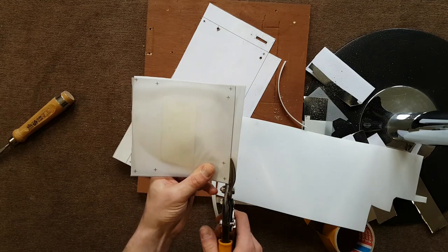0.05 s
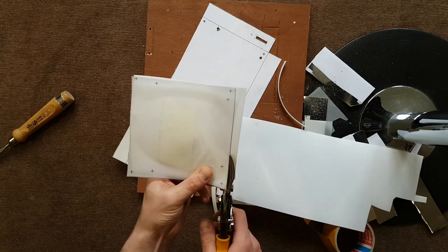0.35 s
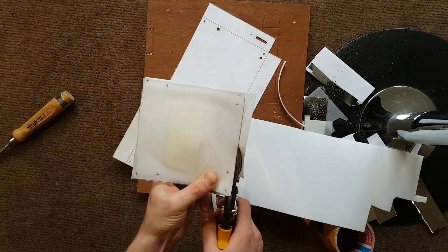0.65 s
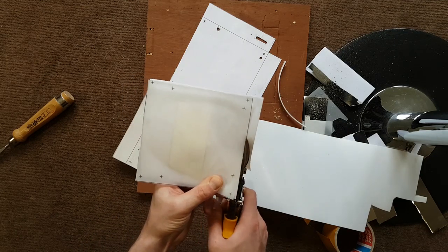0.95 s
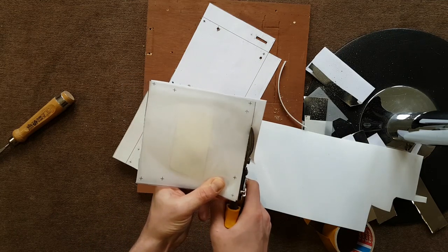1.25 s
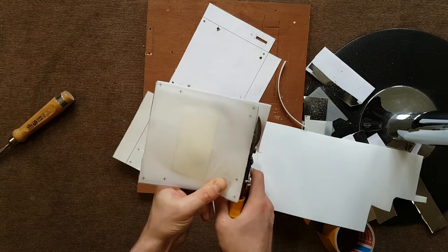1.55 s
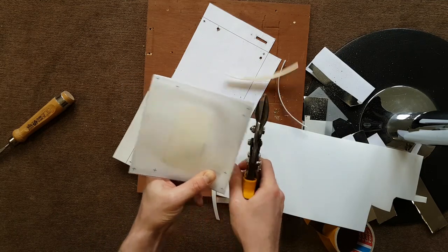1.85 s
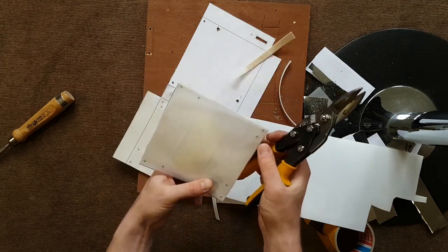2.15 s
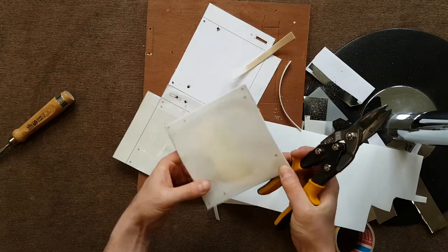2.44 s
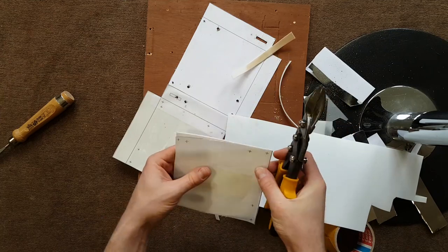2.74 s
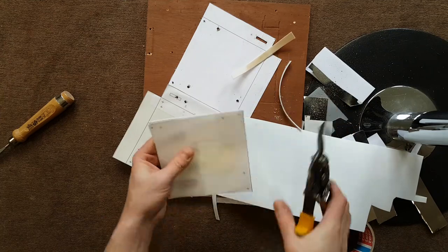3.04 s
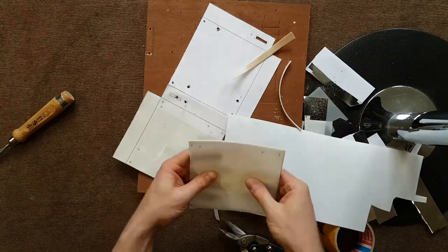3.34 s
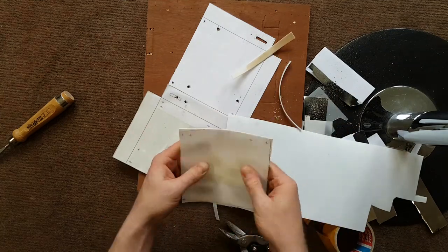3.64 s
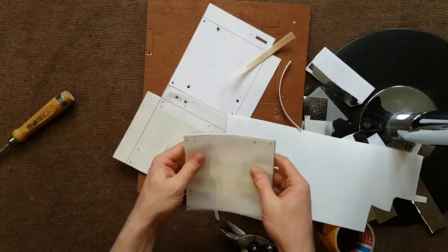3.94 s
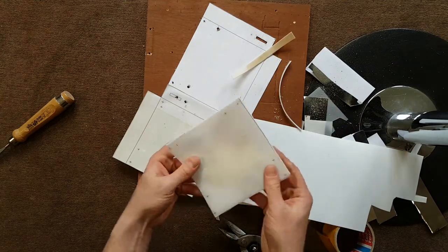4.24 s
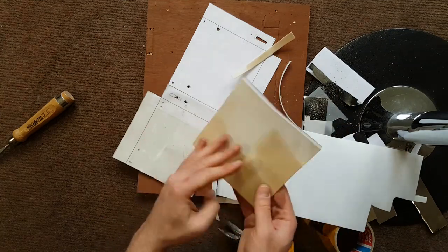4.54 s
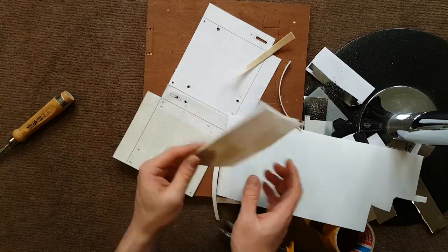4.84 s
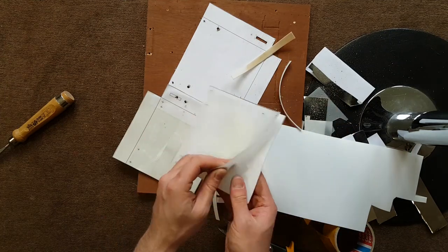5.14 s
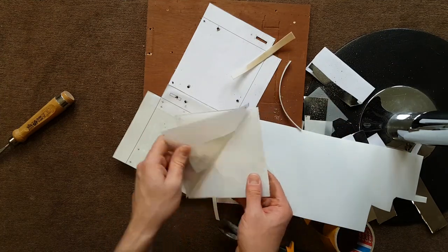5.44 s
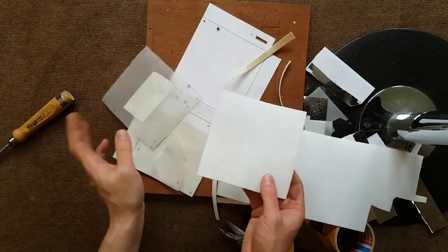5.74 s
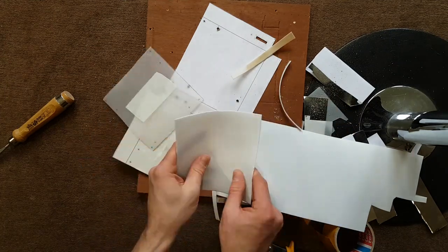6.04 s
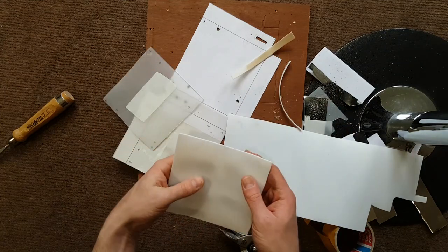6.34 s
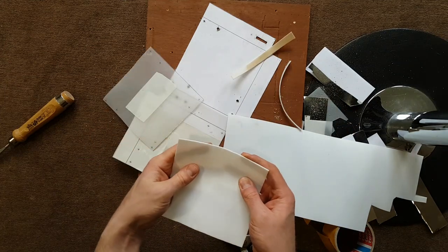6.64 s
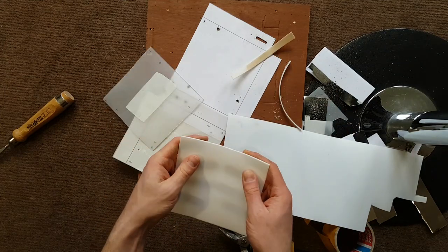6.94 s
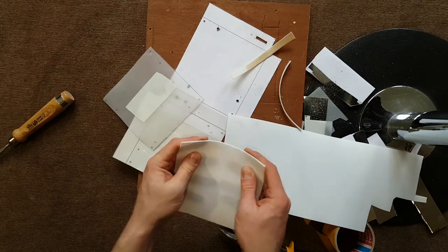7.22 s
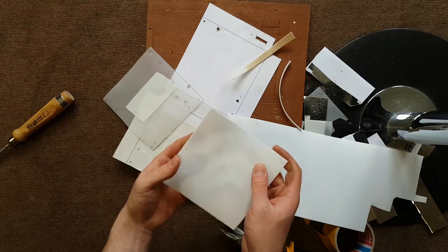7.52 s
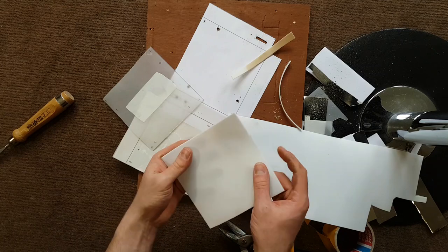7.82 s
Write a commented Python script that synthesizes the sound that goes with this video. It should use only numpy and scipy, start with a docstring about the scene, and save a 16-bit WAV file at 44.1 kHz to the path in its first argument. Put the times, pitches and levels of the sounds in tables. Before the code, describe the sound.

Metal snips crunch quickly through stiff plastic, snap through and clunk down, then film rips off the sheet and paper creaks faintly.

```python
"""Snipping and peeling a laminated sheet

Close stereo microphones at a cloth-covered bench in a small dry room with a faint hum. Metal snips
nibble along stiff plastic in rushes of tiny fractures, snap through its end and are laid down.
The sheet is flexed, its film peels off in three loud rips and is dropped, and the paper inside is
bent quietly, creaking over a background of low rumble and thin hiss."""
import sys
import numpy as np
from scipy import signal
from scipy.fft import rfft, irfft
from scipy.io import wavfile

SR = 44100
rng = np.random.default_rng(int(sys.argv[2]) if len(sys.argv) > 2 else 0)


def store_pcm(level_fs):
    """Save levels as 16-bit WAV."""
    pcm = np.round(np.clip(level_fs, -1, 1) * 32767).astype(np.int16)
    wavfile.write(sys.argv[1], SR, np.atleast_2d(pcm).T)


N = 356328
TIME_S = np.arange(N) / SR


def amp(db):
    """Decibels to gain."""
    return 10 ** (np.asarray(db) / 20)


def rms_one(x):
    """Scale to an rms of one."""
    return x / np.sqrt(np.mean(x ** 2) + 1e-20)


def at_hz(points, hz):
    """Read a table on a log-frequency axis."""
    known_hz, values = np.transpose(points)
    return np.interp(np.log(np.maximum(hz, 1)), np.log(known_hz), values)


def in_time(rows):
    """One curve per column, drawn through the times in the first."""
    times_s, *columns = np.transpose(rows)
    return [np.interp(TIME_S, times_s, column) for column in columns]


def butterworth(x, order, hz, kind):
    """Keep the band above one frequency or between two."""
    return signal.sosfilt(signal.butter(order, hz, kind, fs=SR, output="sos"), x)


def colour(x, spectrum, size=4096):
    """Causal (minimum-phase) filter of the given spectral shape and unit energy."""
    cepstrum = irfft(np.log(amp(at_hz(spectrum, np.fft.rfftfreq(size, 1 / SR)))))
    cepstrum[1:size // 2] *= 2
    cepstrum[size // 2 + 1:] = 0
    response = irfft(np.exp(rfft(cepstrum)))
    return signal.oaconvolve(x, response / np.linalg.norm(response))[:N]


def ring(x, modes):
    """Decaying sines; a mode at 0 dB holds all the energy of the click that strikes it."""
    out = np.zeros(N)
    for hz, db, t60_s in modes:
        decay, angle = amp(-60 / (t60_s * SR)), 2 * np.pi * hz / SR
        sine = signal.lfilter([0, np.sin(angle)], [1, -2 * decay * np.cos(angle), decay ** 2], x + 1e-18)
        out += amp(db) * np.sqrt(2 * (1 - decay ** 2)) * sine
    return out


def fractures(per_s, spread_db, clump_db=5.0, clump_s=0.0025):
    """An endless run of tiny cracks of uneven size and random sign, in stick-slip clumps."""
    knots = np.clip(rng.standard_normal(N // 16), -1.5, 1.5)
    clumps = np.interp(TIME_S / clump_s, np.arange(len(knots)), knots)
    sizes = amp(spread_db * np.clip(rng.standard_normal(N), -2, 2) + clump_db * clumps)
    return (rng.random(N) < per_s / SR) * sizes * rng.choice([-1, 1], N)


def bursts(cracks, starts_s, lengths_s, levels_db, swells_db=0, first_db=-12.5):
    """Stretches of cracking at given rms levels: a clean break, then a run that may swell and eases."""
    out = np.zeros(N)
    for start_s, length_s, db, swell_db in np.broadcast(starts_s, lengths_s, levels_db, swells_db):
        at = max(int(start_s * SR), 0)
        progress = np.linspace(0, 1, max(int(length_s * SR), 2))
        envelope = np.sqrt(1 - progress ** 2) * amp(swell_db * progress)
        run = rms_one(cracks[at:at + len(progress)] * envelope)
        run[0] = amp(first_db) * np.sqrt(len(run))   # energy relative to the whole run
        out[at:at + len(run)] += amp(db) * rms_one(run)
    return out


def stereo_noise(spectrum, side_db, apart_hz=1200):
    """Steady coloured noise, mostly shared by the microphones in the bass, unrelated in the treble."""
    mid, side = (colour(rng.standard_normal(N), spectrum) for _ in range(2))
    side = amp(side_db) * side + butterworth(side, 1, apart_hz, "high")
    return mid + side * [[1], [-1]]


# Decay of the small room: frequency_hz, t60_s
ROOM_DECAY = [(150, 0.083), (400, 0.27), (1000, 0.17), (2800, 0.16), (7000, 0.18), (15000, .14)]
# Echoes at the right microphone over the left, at full lean: frequency_hz, gain_db
ECHO_BALANCE = [(150, -1.5), (300, 3), (600, 1.5), (1500, 4.5), (3000, 11.5), (6000, 13.5), (9000, 7.5),
                (15000, 1)]
def echoes(lean, shared_hz=1300, build_s=0.0015, early_db=10.0, early_s=.0032, scatter_s=0.0016):
    """The room at the microphones: a scattered reflection on the right, a tail dying band by band."""
    t = np.arange(SR // 2) / SR
    reflection = amp(early_db) * (t > early_s) * np.exp(-abs(t - early_s) / scatter_s)
    arrivals = 1 - np.exp(-t / build_s) + np.outer([0, 1], reflection)
    response = np.zeros((2, len(t)))
    edges_hz = np.geomspace(90, 17000, 19)
    for low, high in zip(edges_hz, edges_hz[1:]):
        hz = np.sqrt(low * high)
        decay = amp(-60 * t / at_hz(ROOM_DECAY, hz))
        shared, *own = butterworth(rng.standard_normal((3, len(t))), 2, [low, high], "band")
        tail = (shared + hz / shared_hz * np.array(own)) * arrivals * decay
        tail /= np.linalg.norm(tail, axis=1, keepdims=True)
        balance = amp(lean * at_hz(ECHO_BALANCE, hz) * np.array([[-.5], [.5]]))
        response += tail * np.sqrt(2 * (high - low) / SR) * balance
    return response


def room(x, wet_db, lean, lowest_hz=140, lag_s=.0001, moves_per_s=2.6):
    """Direct sound, reaching the left microphone first, and echoes that change as the hands move."""
    left = butterworth(x + 1e-18, 3, lowest_hz, "high")   # small things radiate no bass
    right = np.pad(left, (round(lag_s * SR), 0))[:N]
    angle = 2 * np.pi * moves_per_s * TIME_S
    tail = sum(signal.oaconvolve([left * share], echoes(lean), axes=1)[:, :N]
               for share in (np.cos(angle), np.sin(angle)))
    return np.array([left, right]) + amp(wet_db) * tail


# Air all around the microphones: frequency_hz, level_db
AIR_SPECTRUM = [(29, -35), (50, -1), (116, -14), (155, -17), (213, -2), (329, -4), (765, -7), (927, -8),
                (1070, -11), (1330, -11.5), (3950, -20.5), (4560, -18), (7950, -22), (13500, -32.5),
                (16000, -37.5)]
# Hum of the room: pitch_hz, width_hz, level_db
HUM_TONES = [(122.3, 8, -77), (208.4, 20, -74), (398.4, 7.5, -84.5), (938, 8.2, -75), (1000, 10, -79.5)]
def room_tone(air_db=-69):
    """Steady air, and narrow bands of noise heard as a wavering hum."""
    hum = 0
    for hz, width_hz, db in HUM_TONES:
        t60_s = np.log(1000) / np.pi / width_hz
        hum += amp(db) * rms_one(ring(rng.standard_normal(N), [(hz, 0, t60_s)]))
    return amp(air_db) * stereo_noise(AIR_SPECTRUM, side_db=-9.5) + hum


# Fingers and loose film sliding on the plastic: time_s, level_db
RUB_LEVELS = [(0.0, -67), (0.2, -70.5), (0.43, -73), (0.58, -69), (1.9, -70), (2.13, -68.5), (2.79, -76),
              (3.29, -74.5), (3.4, -68), (3.91, -73.5), (5.09, -66.5), (5.25, -58), (5.37, -47.5),
              (5.42, -47), (5.5, -55), (5.65, -60), (5.81, -68.5), (5.93, -76)]
# That friction from close by: frequency_hz, level_db
RUB_SPECTRUM = [(300, -10.5), (1000, -1.5), (2500, -0.5), (4500, -1), (7500, -5), (11000, -10), (16000, -8)]
def rubbing(per_s=2470, spread_db=4.0, level_db=-6.5):
    """Fine friction on the plastic: a dense run of tiny slips."""
    rub_db, = in_time(RUB_LEVELS)
    return amp(rub_db + level_db) * colour(rms_one(fractures(per_s, spread_db)), RUB_SPECTRUM)


def crinkling():
    """Lone faint crackles as the handled plastic flexes."""
    return rubbing(per_s=42, spread_db=7.5)


# Strokes of the snips, a bite and then a bump as the jaws reopen:
# start_s, bite_db, length_s, swell_db, bump_db, bump_pitch_hz
STROKES = [(0.0064, -39, 0.022, 11, -50.5, 1020), (0.1385, -32.5, 0.0098, 3, -52, 940),
           (0.3527, -33, .019, 2, -50, 433), (0.4957, -38.5, 0.017, -1, -50, 1210),
           (0.623, -37.5, 0.036, -9, -51, 510), (0.7574, -37, 0.015, 11, -51.5, 920),
           (0.896, -37.5, 0.024, -5, -51, 705), (1.031, -35.5, 0.02, -8, -52.5, 1590),
           (1.1704, -36.5, 0.027, 5, -51.5, 897), (1.311, -37, 0.019, 9, -48, 960),
           (1.4474, -35, 0.025, 0, -45.5, 984), (1.6147, -39, 0.025, 9, -44, 1000),
           (1.7487, -37, .023, 12, -53, 970), (1.853, -35.5, 0.032, 1, -40, 950)]
# Plastic crunching in the jaws, and the bright edge of a break: frequency_hz, level_db
CRUNCH_SPECTRUM = [(200, -26.5), (900, -12.5), (2000, -19.5), (2700, -9), (3300, -6.5), (4500, -4.5),
                   (6700, -2), (8200, -5.5), (10500, -19), (12000, -16), (16000, -18)]
BRIGHT_SPECTRUM = [(1000, -22), (4000, -3.5), (8000, -1.5), (12000, -0.5), (16000, -8)]
# The steel blades: pitch_hz, level_db, t60_s
BLADE_MODES = [(3437, -18, .08), (4274, -17, .1), (4498, -14, .1), (5800, -18, .06), (6680, -15, .1),
               (8106, -21, .08)]
def cutting(level_db=-12.5, ring_db=-1.5, edge_db=-4.0, edge_db_per_s=-450):
    """Each bite is a rush of small fractures that sets the blades ringing; slower bites are duller."""
    start_s, bite_db, length_s, swell_db, _, _ = np.transpose(STROKES)
    cracks = fractures(per_s=4000, spread_db=3.5, clump_db=3.5)
    force = bursts(cracks, start_s, length_s, bite_db + level_db, swell_db, first_db=-8.0)
    edge = bursts(cracks, start_s, length_s, bite_db + level_db + edge_db + edge_db_per_s * length_s)
    blades = amp(ring_db) * ring(force, BLADE_MODES)
    return colour(force, CRUNCH_SPECTRUM) + blades + colour(edge, BRIGHT_SPECTRUM)


# Loose plastic flapping: frequency_hz, level_db
FLAP_SPECTRUM = [(100, -35), (300, -18.5), (600, -7), (900, 0), (1300, -4), (2400, -3.5), (4000, -9),
                 (16000, -36.5)]
def nudging(level_db=-11.5, scrape_db=-9.0, t60_s=.022, reopen_s=.067, fall_s=.097, bounce_s=.057):
    """Reopening jaws bump the sheet, its pitch set by the grip; after the last cut the strip bounces."""
    bumps = [(start_s + reopen_s, db, hz) for start_s, *_, db, hz in STROKES]
    landing_s = LAST_CUT[0] + fall_s
    bounces = [(landing_s + k * bounce_s, -49 - 3 * k, 890) for k in range(3)]
    cracks = fractures(per_s=2300, spread_db=10.5)
    force, ringing = np.zeros((2, N))
    for start_s, db, hz in bumps + bounces:
        push = bursts(cracks, start_s, lengths_s=0.02, levels_db=db + level_db, first_db=-9.0)
        force += push
        ringing += ring(push, [(hz, 0, t60_s)])
    return colour(force, FLAP_SPECTRUM) + ringing + amp(scrape_db) * colour(force, CRUNCH_SPECTRUM)


# Sharp ticks of the plastic, in the hands or inside a bite of the snips: start_s, level_db, hollow_db,
# treble_db
SHEET_TICKS = [(1.515, -41, -13, -1), (1.868, -34, -14, -22), (2.497, -43.5, -4.5, -40),
               (2.567, -44.5, -8, -40), (3.028, -47, -11, -37), (3.428, -55, -30, 7.5),
               (3.824, -52.5, 0.5, -35), (3.979, -53, -1.5, -33), (4.111, -39.5, -11, -37),
               (4.408, -54, 5.5, -37), (4.53, -34.5, -7, -19), (4.668, -31, -10.5, -6),
               (4.76, -31, -30, -9), (4.813, -44, -30, -35), (4.99, -40, -8, -12), (5.655, -38.5, -34, -13),
               (6.095, -55, 7, -40)]
# A tick and its hollow body: frequency_hz, level_db
TICK_SPECTRUM = [(200, -21), (800, -10.5), (2000, 2), (4500, -5), (7000, -5), (10000, -17), (16000, -17.5)]
HOLLOW_SPECTRUM = [(150, -24.5), (400, -5.5), (800, 0.5), (1400, 1.5), (2300, -4), (4000, -17.5),
                   (16000, -44.5)]
def ticking(level_db=-7.0, tick_db=-4.0, bright_db=5.0, length_s=.0025):
    """The plastic cracks in short sharp ticks, some hollow, some thin."""
    start_s, db, hollow_db, treble_db = np.transpose(SHEET_TICKS)
    cracks = fractures(per_s=8000, spread_db=6.0)
    parts = [(TICK_SPECTRUM, tick_db), (HOLLOW_SPECTRUM, hollow_db),
             (BRIGHT_SPECTRUM, treble_db + bright_db)]
    return sum(colour(bursts(cracks, start_s, length_s, db + level_db + part_db, first_db=0.0), spectrum)
               for spectrum, part_db in parts)


# The cut through the end of the sheet: start_s, level_db
LAST_CUT = (1.9112, -11.5)
# Its crack from close by: frequency_hz, level_db
CRACK_SPECTRUM = [(100, -26), (200, -14.5), (400, -13.5), (650, -5.5), (1000, 2), (1400, -8.5), (1900, -11),
                  (2450, -2.5), (3100, -6), (4500, -8), (6400, -3), (8500, -7.5), (11500, -16.5),
                  (16000, -17.5)]
def breaking(level_db=-10.0, length_s=0.0059):
    """The blade tips close: one hard crack, and splinters for a few milliseconds."""
    start_s, db = LAST_CUT
    splinters = fractures(per_s=9000, spread_db=4.0)
    return colour(bursts(splinters, start_s, length_s, db + level_db, first_db=1.5), CRACK_SPECTRUM)


# The snips landing on the bench: start_s, level_db, metal_db
LANDINGS = [(3.2445, -27.5, -16), (3.282, -21.5, 0)]
# The thud through the cloth and the clack of steel: frequency_hz, level_db
THUD_SPECTRUM = [(50, -32), (120, -23), (175, 6), (380, -4), (480, -7.5), (750, -22), (2000, -19),
                 (16000, -82)]
CLACK_SPECTRUM = [(100, -20.5), (400, 9), (1100, -6), (1900, 2), (2600, -3.5), (3200, -3), (4800, -13.5),
                  (7000, -27.5), (11000, -52), (16000, -51)]
# The bench top: pitch_hz, level_db, t60_s
BENCH_TOP_MODES = [(174, -4.5, .1), (230, -13, 0.19), (295, -6.5, 0.1), (379, -6, 0.15), (577, -26, 0.16)]
def setting_down(thud_db=13.5, clack_db=13.0, ring_db=-3.5, rattle_db=-20.0, rattle_s=0.019):
    """The handle lands first, then the steel head, which rattles briefly at its pivot."""
    start_s, db, metal_db = np.transpose(LANDINGS)
    at = (start_s * SR).astype(int)
    blow, metal = np.zeros((2, N))
    blow[at] = amp(db + thud_db)
    metal[at] = amp(db + metal_db + clack_db)
    metal += bursts(fractures(per_s=900, spread_db=5.0), start_s, rattle_s, db + metal_db + rattle_db)
    bench = colour(blow, THUD_SPECTRUM) + amp(ring_db) * ring(blow, BENCH_TOP_MODES)
    return bench + colour(metal, CLACK_SPECTRUM)


# Pops of the flexed sheet: start_s, level_db
FLEX_POPS = [(4.937, -40), (6.095, -45.5), (6.858, -50), (6.978, -55.5)]
# Their dull tone: frequency_hz, level_db
POP_SPECTRUM = [(100, -18), (300, 8), (700, 13), (1200, -1), (2000, -6), (3500, -13), (6000, -40),
                (16000, -50)]
def popping(level_db=-5.0, length_s=0.0017):
    """The bent sheet buckles with a soft pop."""
    start_s, db = np.transpose(FLEX_POPS)
    cracks = fractures(per_s=5000, spread_db=4.0)
    return colour(bursts(cracks, start_s, length_s, db + level_db, first_db=3.0), POP_SPECTRUM)


# Film tearing loose, then sliding onto the papers:
# start_s, length_s, level_db, swell_db, jerk_db, flap_db, pitch_hz
PULLS = [(5.191, .0225, -34, -3, -26, -21, 6300), (5.239, .029, -45.5, -3, -41, -17.5, 3180),
         (5.342, 0.041, -26, 12.5, -23.5, -25.5, 4624), (5.466, .042, -22, 2, -20.5, -12, 4530),
         (5.74, 0.034, -49, -7, -46, -24, 4540)]
# The tearing from close by: frequency_hz, level_db
TEAR_SPECTRUM = [(88, -67.5), (170, -35.5), (550, -28.5), (923, -18), (1300, -14.5), (2300, -10.5),
                 (3200, -6), (4700, 1.5), (6100, 2), (12200, -6), (14500, -9), (16000, -14)]
# The laminated sheet: pitch_hz, level_db, t60_s
LAMINATE_MODES = [(937, -30, .1), (3100, -20, .03), (4600, -14, .025), (6070, -23, .015), (7970, -20, .02)]
def peeling(level_db=-2.5, ring_db=-7.5, t60_s=.018, jerk_share=.45, jerk_flap_db=3):
    """The bond lets go in dense slips, then with a fading jerk; the freed film rings and flaps."""
    slips = fractures(per_s=4000, spread_db=7.0)
    force, flapping, film = np.zeros((3, N))
    for start_s, length_s, db, swell_db, jerk_db, flap_db, hz in PULLS:
        pull = bursts(slips, start_s, length_s, db + level_db, swell_db, first_db=-17.0)
        jerk = bursts(slips, start_s + length_s, jerk_share * length_s, jerk_db + level_db, swells_db=-10)
        force += pull + jerk
        flapping += amp(flap_db) * (pull + amp(jerk_flap_db) * jerk)
        film += ring(pull + jerk, [(hz, ring_db, t60_s)])
    sheet = ring(force, LAMINATE_MODES)
    return colour(force, TEAR_SPECTRUM) + sheet + film + colour(flapping, FLAP_SPECTRUM)


# Low background at the microphones near the end: frequency_hz, level_db
RUMBLE_SPECTRUM = [(15, -53), (25, -13), (75, -5.5), (177, -12), (211, -11), (314, -15), (394, -16),
                   (519, -21.5), (574, -17), (619, -22.5), (1530, -22.5), (5480, -35), (10000, -41),
                   (13000, -62), (22000, -120)]
def rumble(level_db=-68.5):
    """A faint, steady rumble of deep noise."""
    return amp(level_db) * stereo_noise(RUMBLE_SPECTRUM, side_db=-5.5)


# Paper bent in the hands: time_s, strain_db, creak_db
PAPER_BENDS = [(5.95, -74, -72), (6.11, -71.5, -70.5), (6.29, -86, -73.5), (6.55, -79, -72),
               (6.62, -68, -67.5), (6.86, -67, -70.5), (6.95, -79, -69.5), (7.15, -75, -76.5),
               (7.21, -84, -78.5), (7.63, -74.5, -73.5), (8.03, -79, -79), (8.05, -68, -70)]
# Its creak: frequency_hz, level_db
CREAK_SPECTRUM = [(100, -27), (300, 1), (700, 3), (1500, -6.5), (3000, -7), (8000, -29.5)]
def bending_paper(sliding, creak_db=-4.5, drone_db=-2.0, rustle_db=-11.5, pitch_hz=320, t60_s=0.15):
    """Taut paper creaks and drones with the strain, and rustles under sliding fingers."""
    strain_db, creaking_db = in_time(PAPER_BENDS)
    friction = rms_one(fractures(per_s=1000, spread_db=2.0))
    creak = (amp(creaking_db + creak_db) + amp(rustle_db) * sliding) * colour(friction, CREAK_SPECTRUM)
    drone = amp(strain_db + drone_db) * ring(friction, [(pitch_hz, 0, t60_s)])
    return creak + drone


# Thin high background hiss that swells now and then: frequency_hz, level_db
HISS_SPECTRUM = [(1000, -30), (8000, -16), (10500, -9), (13000, -2), (15500, 0)]
def high_hiss(sliding, rest_db=-76):
    """A faint steady background hiss, with swells that follow the sliding fingers."""
    return (amp(rest_db) + sliding) * stereo_noise(HISS_SPECTRUM, side_db=-20.0)


# Fingers shifting their grip on the paper: middle_s, level_db
GRIP_SHIFTS = [(6.28, -65.5), (6.455, -68), (6.535, -70), (6.92, -78), (7.405, -74), (7.465, -69.5),
               (7.905, -69.5)]
def finger_slides(half_width_s=0.034):
    """Strength of the sliding: a smooth rise and fall for each shift of grip."""
    return sum(amp(db) * np.exp(-((TIME_S - middle_s) / half_width_s) ** 2)
               for middle_s, db in GRIP_SHIFTS)


def scene(paper_s=5.93, fade_s=0.0081):
    """The bench from close by; at paper_s rubbing gives way to paper, room tone to rumble and hiss."""
    later = np.clip((TIME_S - paper_s) / fade_s, 0, 1)
    earlier = 1 - later
    snips = room(cutting() + nudging() + breaking(), wet_db=1.0, lean=0.93)
    ticks = room(ticking() + popping() + earlier * crinkling(), wet_db=2.5, lean=0.9)
    bench = room(setting_down(), wet_db=-0.5, lean=0.31) * amp([[-3.0], [2.0]])   # off to the right
    film = room(peeling(), wet_db=0.0, lean=1.0, lowest_hz=293.6)
    sliding = finger_slides()
    friction = earlier * rubbing() + later * bending_paper(sliding)
    hiss = later * high_hiss(sliding)
    hands = room(friction, wet_db=2.5, lean=.2)
    background = earlier * room_tone() + later * rumble()
    return snips + ticks + bench + film + hands + hiss + background


def record(dry):
    """The microphone signal, cut steeply above 16 kHz."""
    return signal.sosfilt(signal.ellip(12, .1, 80, 16000, fs=SR, output="sos"), dry)


dry = scene()
out = record(dry)
store_pcm(out)
```